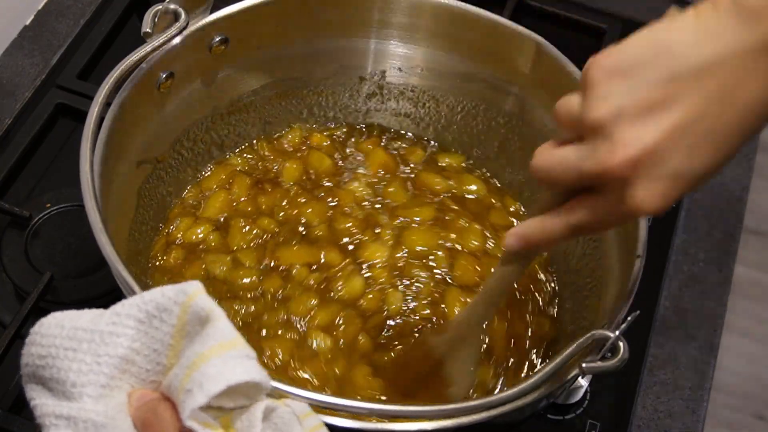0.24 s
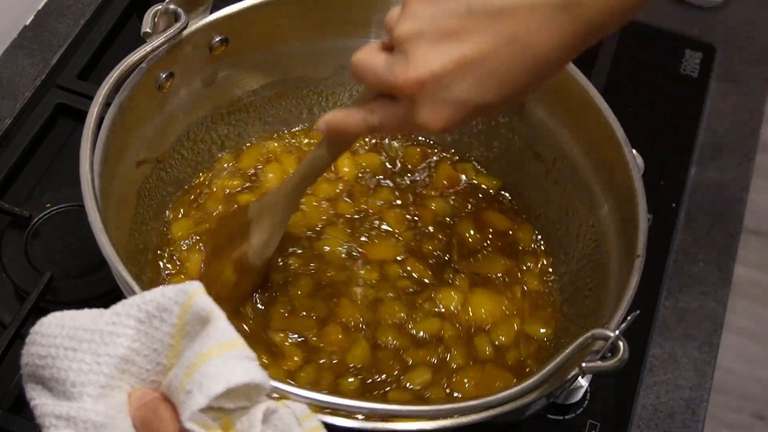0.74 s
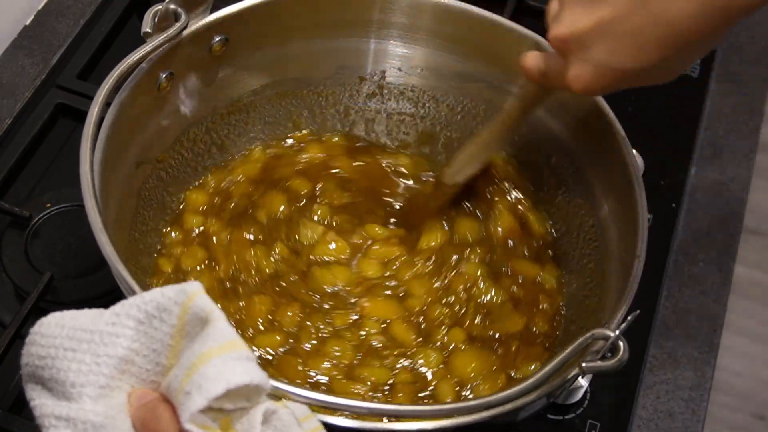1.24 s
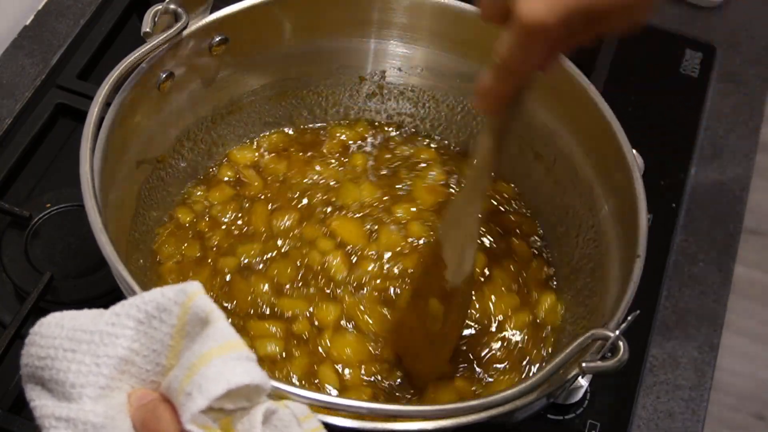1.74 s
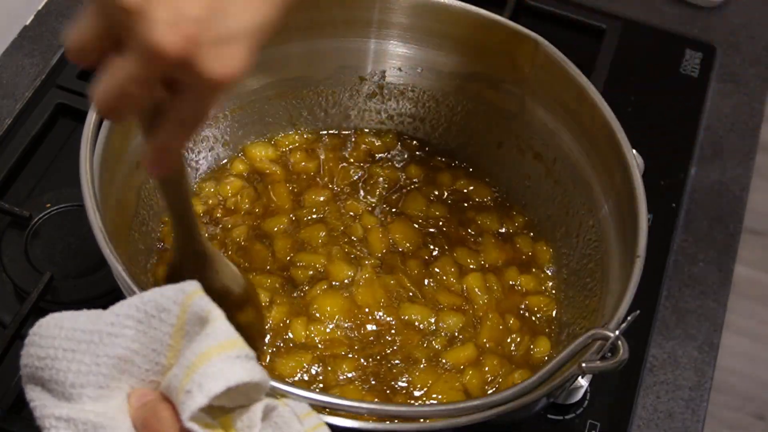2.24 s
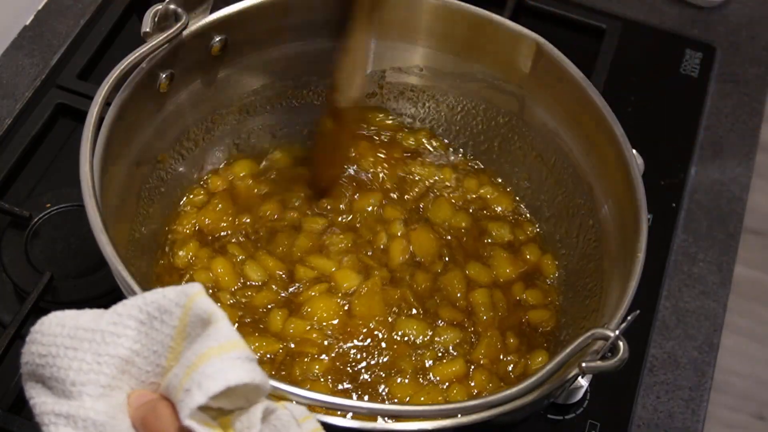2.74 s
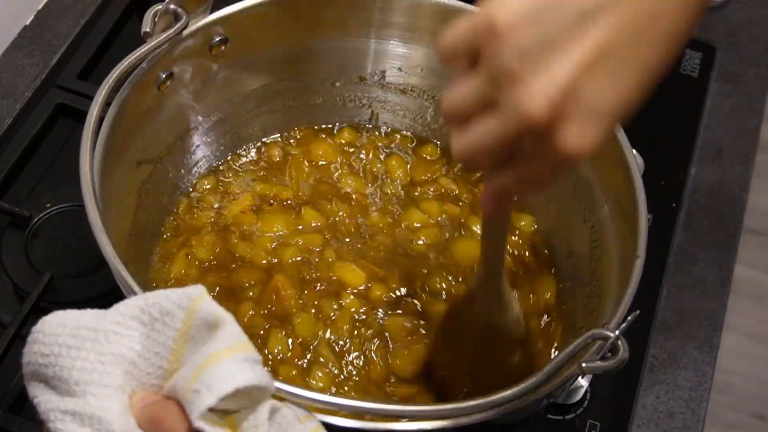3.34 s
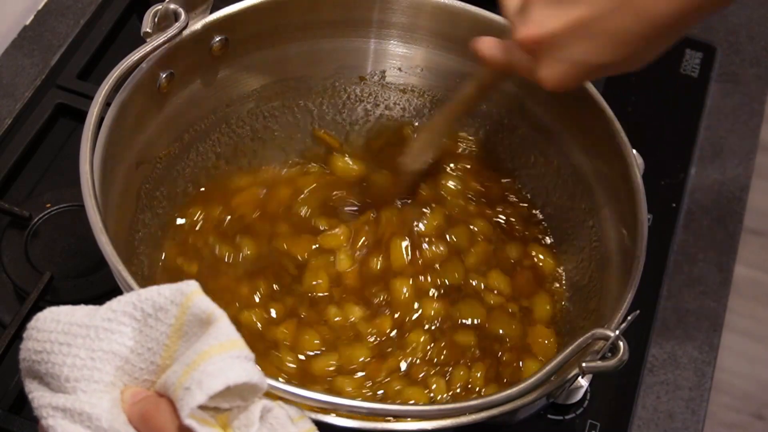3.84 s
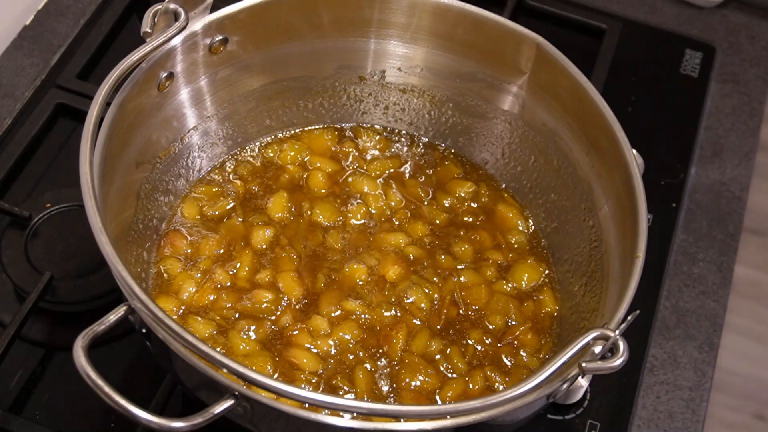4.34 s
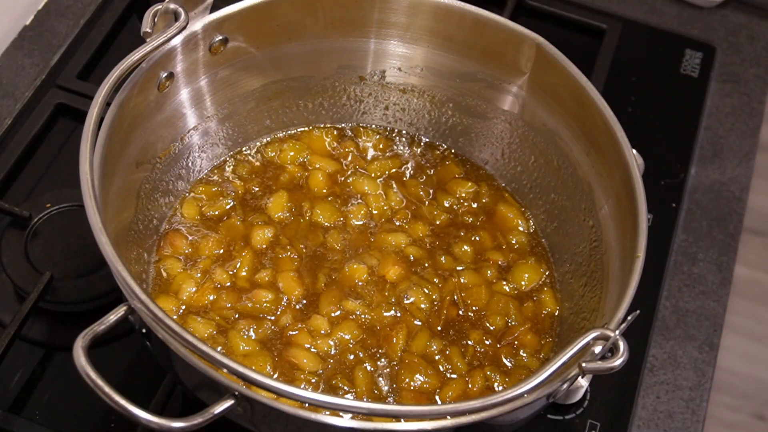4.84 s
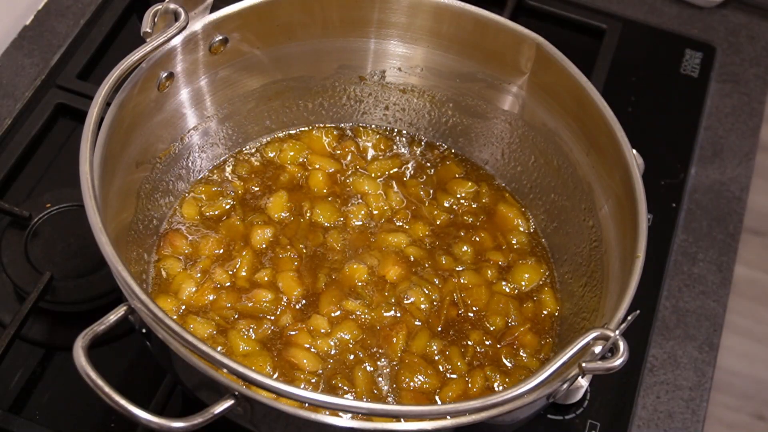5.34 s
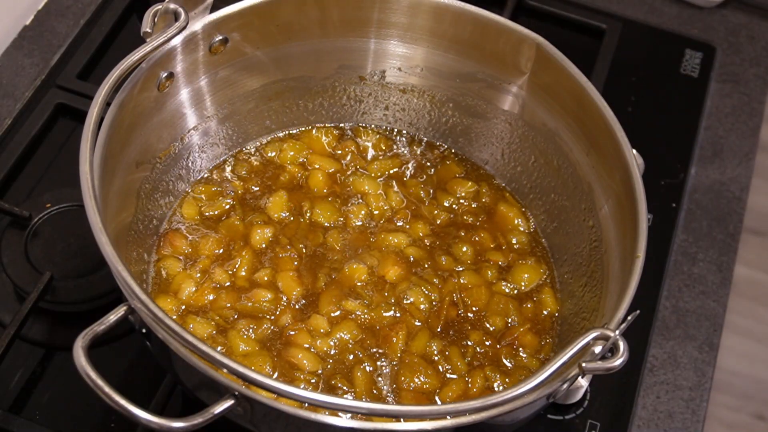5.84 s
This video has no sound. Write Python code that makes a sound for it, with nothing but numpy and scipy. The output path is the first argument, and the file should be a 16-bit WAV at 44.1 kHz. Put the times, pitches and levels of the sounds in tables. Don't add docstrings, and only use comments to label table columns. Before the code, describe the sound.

A kitchen hob heard close in stereo, treble slightly softened. From 0 s a gas burner hisses with a pipe-like colour over a grainy, bubbling roar, while a hood fan hums low with rushing air. A wooden spoon stirs softly through jam, with a faint tick at 0.14 s and a stronger brush around 1.2 s. Thin, high stuttering squeaks begin near 1 s. At 2.2 s a solid knock booms in the steel pan, followed by ringing scrapes along its wall, swelling at 2.3 and 2.7 s. From 3.1 s the sound is sped up: the hiss flutters quickly and small taps are clipped to puffs. At 4.06-4.14 s comes a loud, dull, cracking clatter with deep thumps, then small settling ticks. The fan fades and is gone by about 4.5 s. Choppy burner hiss continues to 6 s, with frequent short piercing squeaks and sparse faint ticks and spits.

```python
import sys
import numpy as np
from scipy import signal
from scipy.fft import rfft, irfft, next_fast_len
from scipy.io import wavfile
from scipy.ndimage import map_coordinates

SR = 44100
rng = np.random.default_rng(int(sys.argv[2]) if len(sys.argv) > 2 else 0)


def pcm_store(signal):
    levels = np.round(np.clip(np.atleast_2d(signal), -1, 1) * 32767)
    wavfile.write(sys.argv[1], SR, levels.astype(np.int16).T)


def how_loud(loudness_db):
    steps = np.asarray(loudness_db, float) / 20
    return 10 ** steps


N = 269010

SPLICE_S = 3.11
PIECE, FIRST = 1024, 404


def unit(x):
    return x / np.sqrt(np.mean(x ** 2) + 1e-20)


def along(points, hz):
    f, v = np.transpose(points)
    return np.interp(np.log(hz + 1), np.log(f + 1), v)


def curves(rows):
    s, *cols = np.transpose(rows)
    return [np.interp(np.arange(N) / SR, s, c) for c in cols]


def wobble(rate):
    knots = rng.standard_normal(int(N * rate / SR) + 4)
    return map_coordinates(knots, [np.arange(N) * rate / SR])


def filtered(x, response):
    n = x.shape[-1]
    m = next_fast_len(n + 8192)
    spectrum = rfft(x, m) * response(np.fft.rfftfreq(m, 1 / SR))
    return irfft(spectrum, m)[..., :n]


def resonance(f, hz, width_hz, db):
    return how_loud(db) * 1j * f * width_hz / (hz * hz - f * f + 1j * f * width_hz)


def modes(table):
    return lambda f: sum((-1) ** k * resonance(f, *mode) for k, mode in enumerate(table))


def band(x, hz, width_hz):
    return unit(filtered(x, lambda f: resonance(f, hz, width_hz, 0) ** 2))


def add(out, s, sound):
    part = out[:, max(round(s * SR), 0):][:, :sound.shape[1]]
    part += sound[:, :part.shape[1]]


def spliced(response, jumps):
    a, b = unit(filtered(rng.standard_normal((2, 2, N)), response))
    turn = (np.arange(N) - FIRST) / PIECE
    fade = np.cos(np.pi * turn / 2) ** 2
    even = jumps[2 * np.round(turn / 2).astype(int)]
    odd = jumps[2 * np.floor(turn / 2).astype(int) + 1]
    pieces = a * fade * even + b * (1 - fade) * odd
    return np.where(np.arange(N) < SPLICE_S * SR, a, pieces)


# (time [s], hum level [dB], air rush level [dB])
FAN_RUN = [(0, -53, -48.5), (1, -54, -46), (2.4, -52.5, -47.5), (3.1, -54, -48), (3.5, -55, -50),
           (3.95, -58.5, -52), (4.14, -59.5, -51.5), (4.44, -73, -54), (4.5, -78, -77), (4.6, -83, -82)]
# (frequency [Hz], level [dB])
HUM_LINES = [(50, -9), (100, -3.5), (133, -11.5), (200, 1), (300, -3), (400, -4.5), (600, -15.5),
             (700, -17.5)]
# (frequency [Hz], density [dB per Hz])
DUCT_AIR = [(18, -60), (32, -28), (50, -4), (130, -7), (300, 1), (450, 1), (560, -8.5), (1500, -11),
            (4000, -16.5), (9000, -21.5), (15000, -37)]


def fan(chance):
    hum_db, rush_db = curves(FAN_RUN)
    turns = np.arange(N) / SR + 0.00018 * wobble(8)
    hum = 0
    for hz, db in HUM_LINES:
        phase = 2 * np.pi * hz * turns + 0.5 * rng.standard_normal()
        hum = hum + how_loud(db + 0.87 * wobble(8.8)) * np.cos(phase)
    rush = spliced(lambda f: how_loud(along(DUCT_AIR, f)), how_loud(3.2 * chance)) * how_loud(2.13 * wobble(7.95))
    slat_modes = modes([(2185, 60, 0), (1860, 70, 1), (435, 30, -2)])
    slats = spliced(lambda f: slat_modes(f) ** 2, how_loud(chance))
    return how_loud(hum_db + 4) * hum * [[1], [0]] + how_loud(rush_db - 1.5) * rush + how_loud(rush_db - 20) * slats


# (time [s], level [dB])
GAS_HISS = [(0, -51), (1.5, -51.5), (2.5, -52), (3.4, -54), (4.03, -54.5), (4.5, -52), (5.2, -52.5),
            (6.1, -53.5)]
# (frequency [Hz], width [Hz], level [dB])
PIPE_MODES = [(1038, 70, -13.5), (1870, 72, 1.5), (1994, 180, -4), (2183, 33, -0.5), (4675, 346, -6),
              (7144, 216, -4), (8130, 42, -12), (9350, 280, -22.5), (10640, 240, -24), (12170, 300, -25),
              (14200, 400, -44)]
# (frequency [Hz], density [dB per Hz])
FLAME_AIR = [(18, -60), (32, 0), (60, 0.5), (130, -10), (205, -4.5), (400, -9), (550, -18.5), (1500, -19),
             (3000, -18.5), (4100, -26.5), (6100, -28), (8500, -19), (10000, -36.5), (15700, -39.5)]


def pipe(f):
    power = 0
    for hz, width_hz, db in PIPE_MODES:
        skirt = 1 + ((f - hz) / width_hz / 3.6) ** 2
        power = power + np.abs(resonance(f, hz, width_hz, db)) ** 2 / skirt
    return np.sqrt(power)


def burner(chance):
    hiss_db, = curves(GAS_HISS)
    jets = spliced(pipe, how_loud(0.7 * chance))
    bubbling = how_loud(0.71 * wobble(40) + 0.45 * wobble(8.4))
    roar = spliced(lambda f: how_loud(along(FLAME_AIR, f)), how_loud(1.7 * chance)) * bubbling
    return how_loud(hiss_db + 5.5 + 0.68 * wobble(5.23)) * jets + how_loud(0.7 * hiss_db - 13.5) * roar


# (time [s], peak level [dB], length [s])
JET_SQUEAKS = [(0.98, -49, 0.032), (1.03, -42, 0.077), (1.116, -52, .13), (1.336, -41.5, .066),
               (1.693, -45, .095), (2.137, -43.5, .09), (2.809, -40, 0.086), (2.974, -41.5, .07),
               (3.135, -52, .045), (3.583, -48, .035), (3.826, -49, 0.041), (4.294, -40, 0.031),
               (4.53, -40.5, 0.02), (4.77, -49, .067), (4.902, -36.5, .025), (4.989, -48, .035),
               (5.092, -40, .06), (5.237, -53, .07), (5.319, -42.5, 0.038), (5.367, -50, .03),
               (5.406, -40, .035), (5.627, -43.5, .025), (5.665, -39, 0.027), (5.83, -52, .06),
               (5.962, -36.5, 0.037), (6.065, -50, 0.037)]
SQUEAK_HZ, SQUEAK_SCATTER_HZ = 8093, 44.7
EDGE_S, FADE_DB_PER_S = 0.014, 40
PIP_HZ, PIP_DB = 31, 2


def squeaks():
    out, t = np.zeros((2, N)), np.arange(8192) / SR
    stutter = how_loud(2.2 * wobble(110))
    for s, db, length in JET_SQUEAKS:
        hz = SQUEAK_HZ + SQUEAK_SCATTER_HZ * rng.standard_normal()
        breath = band(rng.standard_normal((2, len(t))), hz, width_hz=290)
        tone = np.sin(2 * np.pi * hz * t) * [[1], [0.8]] + 0.5 * breath
        shape = np.clip(np.minimum(t, length + 0.011 - t) / EDGE_S, 0, 1)
        pips_db = PIP_DB * np.cos(2 * np.pi * PIP_HZ * (t - 0.006))
        add(out, s - 0.012, tone * shape * how_loud(db - 7.5 - FADE_DB_PER_S * t - pips_db))
    return out * stutter


# (time [s], pressure level [dB])
STIRRING = [(0, -52), (.2, -55), (.63, -56.5), (.95, -55.5), (1.14, -48), (1.27, -47.5), (1.5, -59),
            (2.15, -54), (2.24, -47)]
# (time [s], pressure level [dB])
WALL_RUB = [(2.25, -42), (2.28, -38), (2.34, -43), (2.56, -46.5), (2.61, -40.5), (2.71, -36), (2.78, -41.5),
            (2.9, -44.5), (3.1, -44.5)]
# (frequency [Hz], density [dB per Hz])
RUB_COLOUR = [(550, -17), (1000, -4), (1600, -5), (2300, 1), (3200, -2), (5000, -2), (6500, -3), (8500, -9),
              (11000, -18.5), (15700, -25)]
# (frequency [Hz], width [Hz], level [dB])
PAN_MODES = [(1334, 15, 7.5), (2155, 33, 4), (2340, 15, 5), (3590, 32, -9), (3654, 14, 6),
             (4130, 460, -8.5), (4550, 47, -37), (5200, 77, -1), (5960, 36, -29), (6200, 100, -6)]
LIFT_S = 0.016
RING_STIR_DB, RING_TOP_DB = -13.5, -6
RING_GROWS, RING_FULL_DB = 1.8, -40.5


def wall_ring(f):
    return np.sqrt(sum(np.abs(resonance(f, *mode)) ** 3 for mode in PAN_MODES))


def scrape():
    press_db, = curves(STIRRING + WALL_RUB + [(WALL_RUB[-1][0] + LIFT_S, -90)])
    pressed_db = RING_TOP_DB + RING_GROWS * np.minimum(press_db - RING_FULL_DB, 0)
    ring_db = np.where(np.arange(N) < WALL_RUB[0][0] * SR, RING_STIR_DB, pressed_db)
    jerks = rng.standard_normal((2, N)) * how_loud(1.7 * wobble(300)) * how_loud(0.8 * wobble(40))
    rub = unit(filtered(jerks, lambda f: how_loud(along(RUB_COLOUR, f))))
    ring = unit(filtered(jerks, wall_ring))
    return how_loud(press_db) * (rub + how_loud(ring_db + 1.5) * ring)


# (time [s], peak level [dB], main mode [Hz], crack level [dB], t60 [s])
SPOON_KNOCKS = [
    (0.136, -28, 2180, -15, 0.024),
    (2.195, -13, 2554, -37, 0.059),
    (3.745, -27.5, 1870, 10, 0.016),
    (4.085, -15.5, 1216, 9.5, 0.043),
    (4.115, -6, 1014, -6, 0.012),
    (4.138, -5, 976, 6.5, 0.029),
]
BOOM_DB = -1
ATTACK_S = 0.0002


def knocks():
    out, t = np.zeros((2, N)), np.arange(4096) / SR

    def sine(hz):
        return np.sin(2 * np.pi * hz * t)

    def decay(t60):
        return how_loud(-60 * t / t60)

    for s, db, hz, crack_db, t60 in SPOON_KNOCKS:
        noise = rng.standard_normal((3, 2, len(t)))
        struck = 1.077 * sine(hz) + 0.35 * sine(1.1 * hz)
        struck = struck + min(700 / hz, 1) * sine(1520) + 0.3 * decay(0.03) * sine(3300)
        grit = (0.54 + 0.24 * decay(0.02)) * band(noise[0], 2400, width_hz=2700)
        main = struck * [[1], [0.3]] + grit
        ping = sine(4600) * decay(0.009) * [[1], [0.3]]
        snap = decay(0.036) * band(noise[1], 5500, width_hz=1700)
        crack = how_loud(crack_db) * (1.2 * ping + 0.74 * snap)
        boom = (s < SPLICE_S) * how_loud(db + BOOM_DB) * decay(0.4) * band(noise[2], 480, width_hz=990)
        rise = 1 - np.exp(-t / ATTACK_S)
        kept = np.where(s > SPLICE_S, t < 0.016, 1)
        add(out, s, how_loud(db - 8.5) * (main * decay(t60) + crack + boom) * rise * kept)
    return filtered(out, lambda f: 1 / (1 + 1j * f / 7000) ** 3)


# (time [s], peak level [dB], main mode [Hz], pan body
# level [dB], rattle level [dB])
LIGHT_TAPS = [(0.137, -34, 3000, -3, 6), (3.084, -25.5, 2130, -16, -11), (3.131, -15.5, 2400, -4.5, -14),
              (3.137, -33, 900, -2, -10), (3.155, -34.5, 4700, 1.5, 8), (3.175, -29.5, 3750, 5, 8.5),
              (3.256, -24.5, 4130, -5, 3), (3.321, -30, 2600, -8, -13), (3.398, -32, 1080, -1, -1),
              (3.488, -43, 1430, -14, -11), (3.693, -28, 630, -14, -11), (3.814, -41, 600, -14, -10),
              (3.952, -33.5, 1640, -11, -4), (4.207, -34, 2070, -5, -7), (4.305, -35, 2100, -20, 0),
              (5.057, -37, 1590, 4.5, 2), (5.182, -35.5, 2100, 0, -6), (5.964, -46, 4450, -10, -14)]
# (time [s], peak level [dB], main mode [Hz], body level [dB], rattle level [dB])
SET_DOWN = [
    (4.059, -18, 1010, -4, -9),
    (4.062, -7, 1260, -9, -5.5),
    (4.079, -14, 1270, -6, -4),
    (4.098, -19.5, 1070, -2, -11),
    (4.113, -10, 1120, -21, -13),
    (4.125, -29, 1100, 1, 6),
    (4.244, -25.5, 650, 2, -30.5),
    (4.249, -20, 1580, -3, -27),
    (4.393, -30.5, 1020, -0.5, 3),
    (4.4, -31, 3300, -5, 0),
]
HISS_DB, HISS_GROWS = -58, 0.2


def puffs():
    out = np.zeros((2, N))
    wall = modes([(850, 200, 0), (1330, 150, 0), (2200, 350, 2), (2650, 250, -2), (3300, 500, -3)])
    for s, db, hz, body_db, rattle_db in LIGHT_TAPS + SET_DOWN:
        noise = rng.standard_normal((4, 2, 2048))
        pan = unit(filtered(noise[1], lambda f: wall(f) / (1 + (f / 4200) ** 4)))
        body = band(noise[0], hz, width_hz=770) + how_loud(body_db) * pan
        rattle = how_loud(rattle_db) * band(noise[2], 4700, width_hz=3100)
        hiss = how_loud(HISS_DB - db + HISS_GROWS * (db + 25)) * band(noise[3], 10500, width_hz=8000)
        soft = filtered(body + rattle + hiss, lambda f: 1 / np.sqrt(1 + (f / 11000) ** 4))
        add(out, s - 0.006, how_loud(db - 15.5) * soft[:, -PIECE:] * np.hanning(PIECE) ** 0.6)
    return out


# (time [s], level [dB])
JAM_SPITS = [
    (3.176, -38),
    (3.742, -37),
    (4.393, -33),
    (5.964, -52),
]


def spits():
    out = np.zeros((2, N))
    for s, db in JAM_SPITS:
        spit = band(rng.standard_normal((2, 2048)), 8500, width_hz=8000)[:, -PIECE:]
        add(out, s - 0.006, how_loud(db - 14) * spit * np.hanning(PIECE))
    return out


# (time [s], peak level [dB], frequency [Hz])
FLOOR_BUMPS = [(3.129, -44, 195), (3.321, -49, 794), (3.395, -41, 304), (3.694, -40, 400),
               (4.061, -28.5, 246), (4.084, -34.5, 301), (4.109, -35, 240), (4.138, -32, 199),
               (4.244, -35.5, 421), (4.245, -42, 172)]
# (time [s], peak level [dB], frequency [Hz])
STAND_JOLTS = [
    (4.063, -34, 67),
    (4.081, -27.5, 54.6),
    (4.084, -34, 110),
    (4.108, -37, 48),
    (4.139, -39, 81),
]
ROCK_S, ROCK_GAP_S, ROCK_DB, ROCK_HZ = 4.2, 0.049, -43, 76


def thumps():
    out = np.zeros((2, N))
    rocks = []
    for k in range(5):
        rocks.append((ROCK_S + ROCK_GAP_S * k, ROCK_DB, ROCK_HZ * how_loud(rng.standard_normal())))
    for s, db, hz in FLOOR_BUMPS + STAND_JOLTS + rocks:
        t = np.arange(round(PIECE * (1 + 50 / hz))) / SR
        add(out, s - 0.008, how_loud(db) * np.sin(2 * np.pi * hz * t) * np.hanning(len(t)) * [[1], [0.3]])
    return out


# (frequency [Hz], side minus mid [dB])
STEREO_WIDTH = [(60, -46), (110, -20), (200, -18.5), (380, -18.5), (700, -10), (1290, -14.5), (2380, -14),
                (4400, -10.5), (8120, -7.5), (15000, -0.5)]
# (frequency [Hz], left minus right [dB])
BALANCE = [(100, -0.5), (2000, 0), (6000, -1), (10000, -1.5), (14000, 1.5)]


def scene():
    chance = rng.standard_normal(N // PIECE + 4)
    beds = fan(chance) + burner(chance) + squeaks()
    hits = (knocks() + puffs() + spits() + thumps()) * how_loud([[0], [-3]])
    mid, side = beds + scrape() + hits
    side = filtered(side, lambda f: how_loud(along(STEREO_WIDTH, f)))
    ports = np.array([mid + side, mid - side])
    return filtered(ports, lambda f: how_loud(np.outer([0.5, -0.5], along(BALANCE, f))))


def low_pass(x):
    return signal.sosfilt(signal.butter(12, 15720, fs=SR, output="sos"), x)


def record(dry):
    soft = filtered(dry, lambda f: 1 / np.sqrt(1 + (f / 14000) ** 4))
    return low_pass(soft)


dry = scene()
out = record(dry)
pcm_store(out)
```